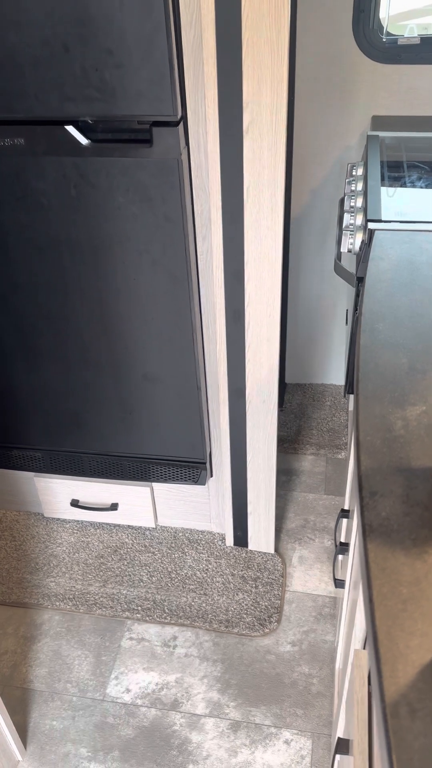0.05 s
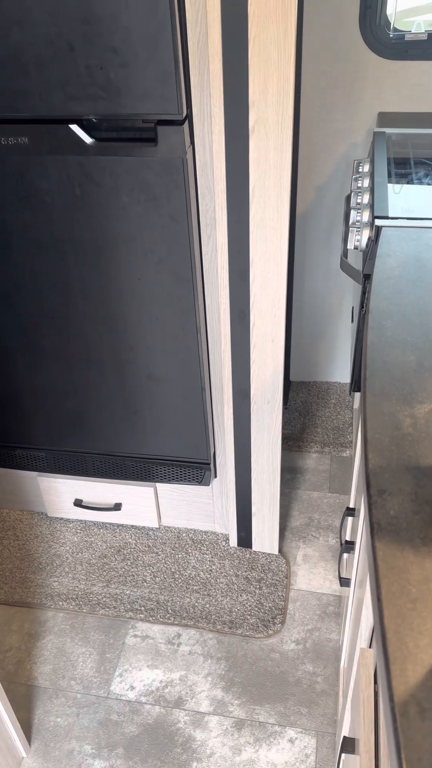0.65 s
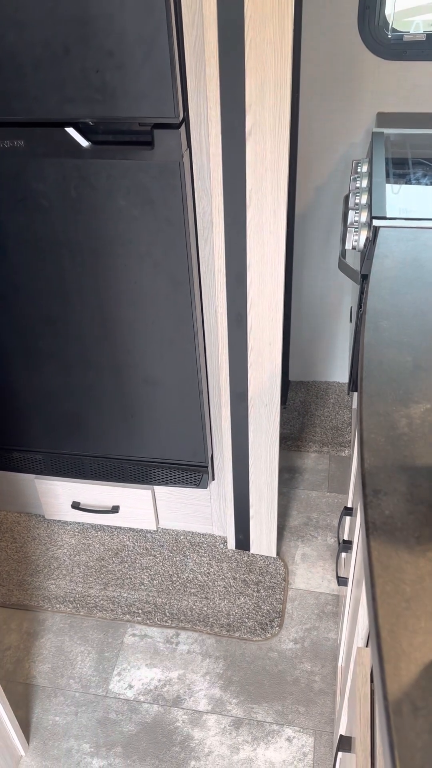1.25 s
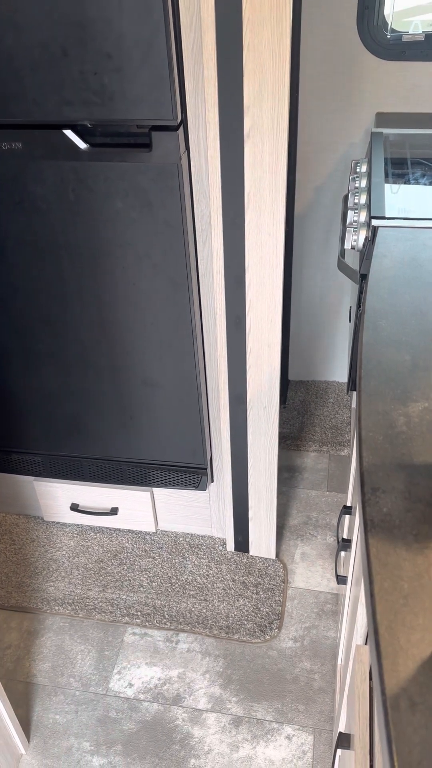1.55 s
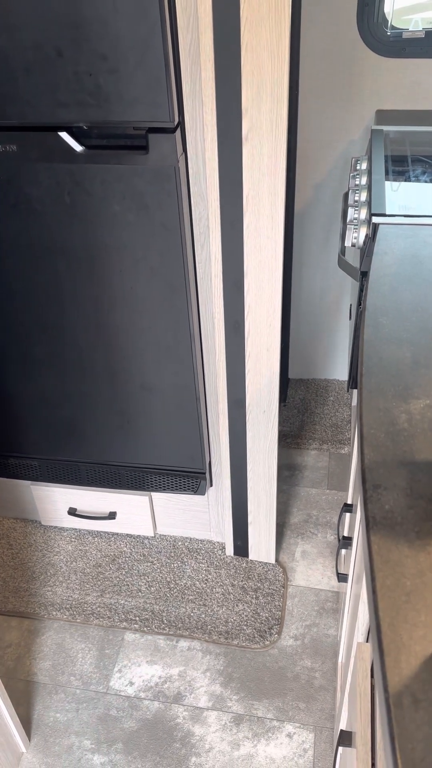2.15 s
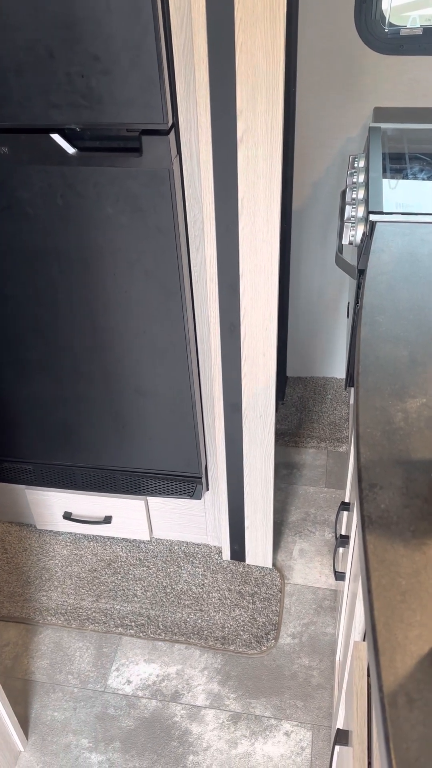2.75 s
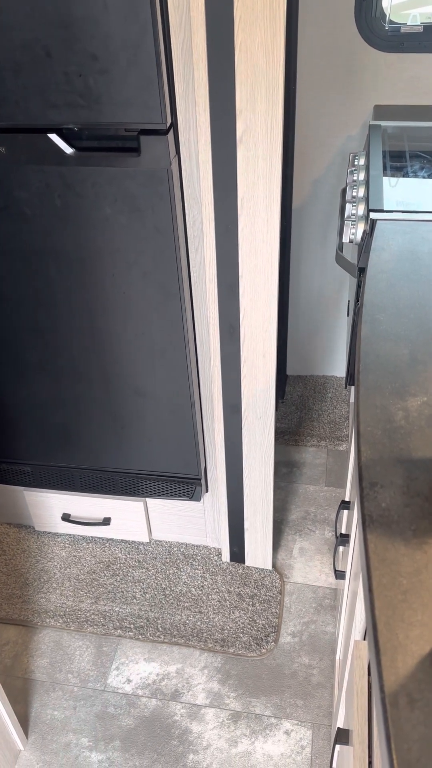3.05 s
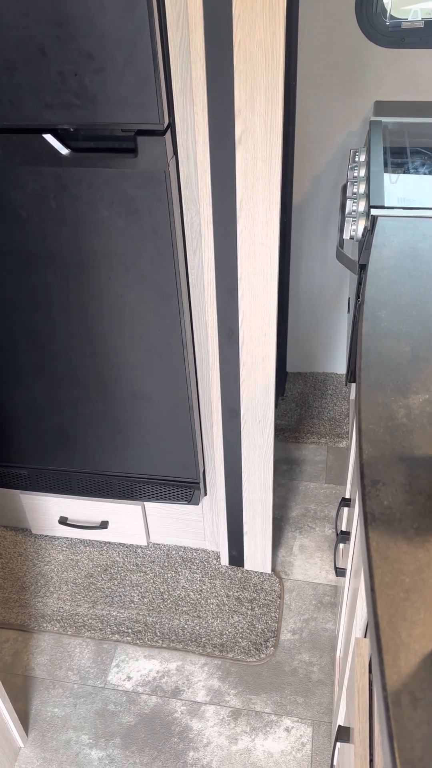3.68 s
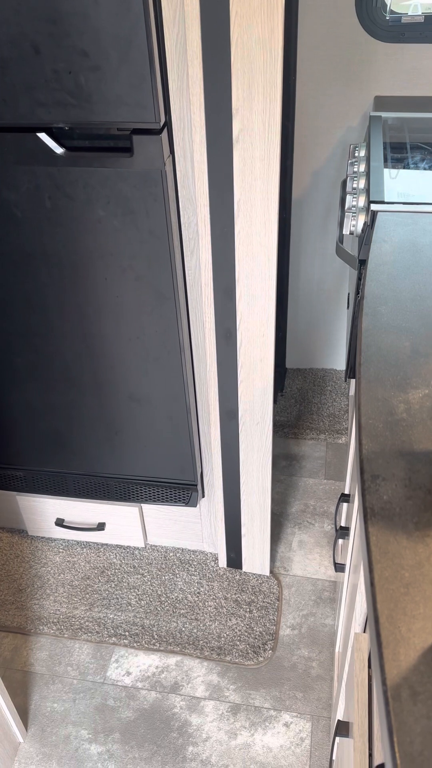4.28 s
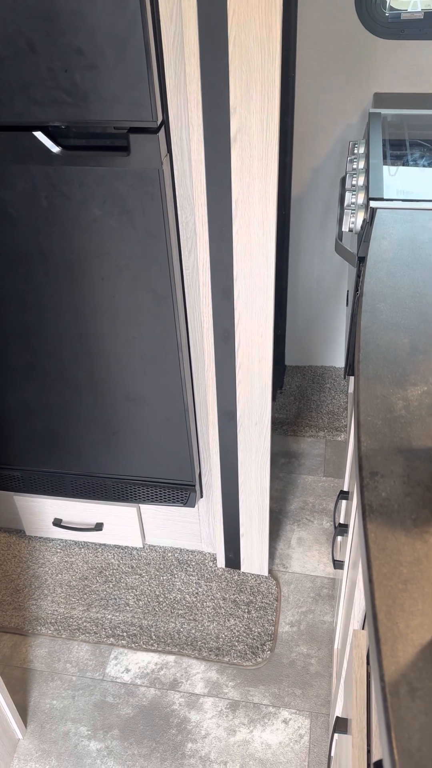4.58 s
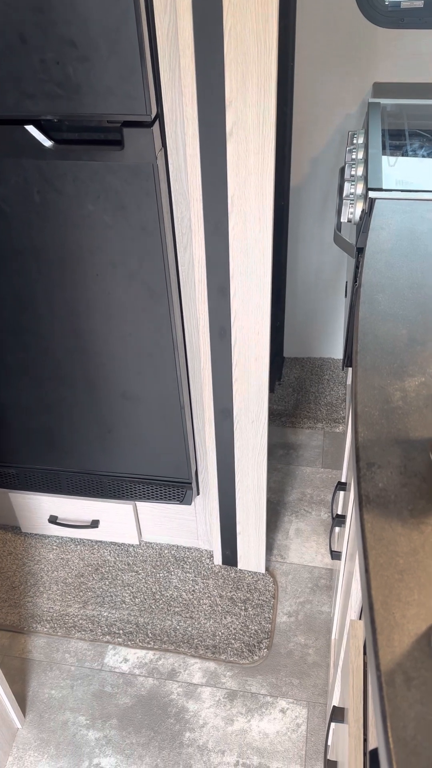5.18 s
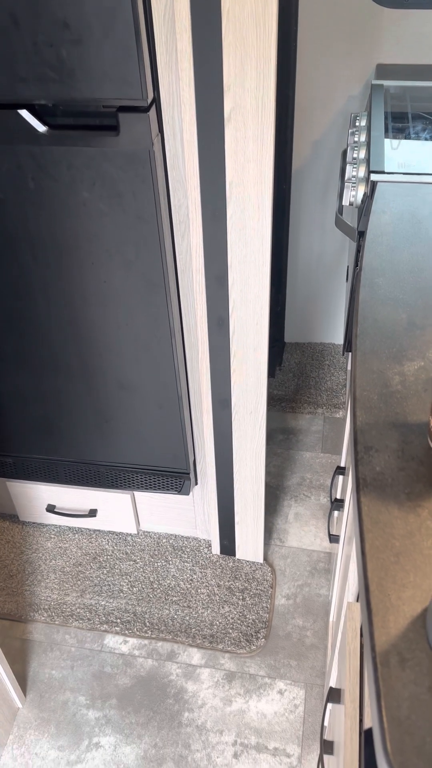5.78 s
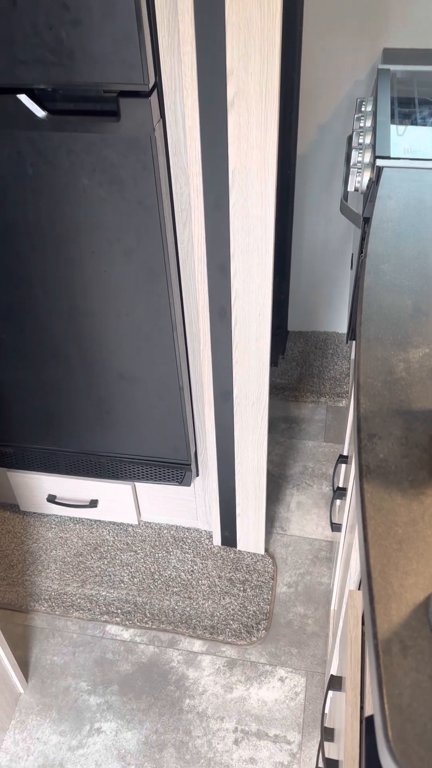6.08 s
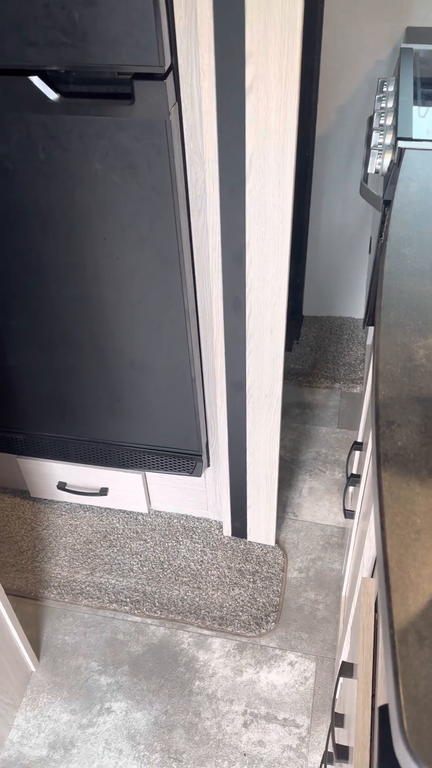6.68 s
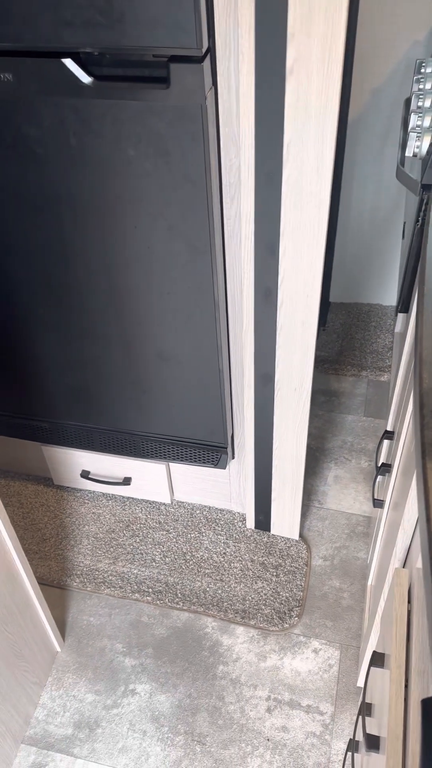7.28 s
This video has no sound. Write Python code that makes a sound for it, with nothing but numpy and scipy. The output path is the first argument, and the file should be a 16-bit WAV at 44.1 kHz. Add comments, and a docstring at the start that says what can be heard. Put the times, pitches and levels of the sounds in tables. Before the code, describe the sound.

Inside a trailer, a slide-out motor drones with a faint whine, pauses, clunks back in and keeps moving.

```python
"""An electric gear motor drives a trailer's slide-out room, heard from inside.
The drive hums through the floor, the gear mesh whines, rollers rumble and rubber seals hiss.
The room halts for half a second while the hum throbs on, then clicks back in, groans and runs on.
The frame knocks, cabinets tick, panels boom and drone. Behind it all are a steady low rumble
and faint chirps, perhaps a bird outside."""
import sys
import numpy as np
from scipy import signal
from scipy.fft import rfft, irfft
from scipy.io import wavfile
from scipy.ndimage import uniform_filter1d

SR = 44100
rng = np.random.default_rng(int(sys.argv[2]) if len(sys.argv) > 2 else 0)


def store_pcm(level_fs):
    """Save levels as 16-bit WAV."""
    pcm = np.round(np.clip(level_fs, -1, 1) * 32767).astype(np.int16)
    wavfile.write(sys.argv[1], SR, np.atleast_2d(pcm).T)


N = 323694
TIME = np.arange(N) / SR
BINS_HZ = np.fft.rfftfreq(N, 1 / SR)
STOP_S, COAST_S, RESTART_S, SPIN_UP_S = 0.32, 0.16, 0.772, 0.23


def amp(db):
    """dB to gain."""
    return 10 ** (np.asarray(db) / 20)


def unit_rms(x):
    """Scale to rms 1."""
    return x / np.sqrt(np.mean(abs(x) ** 2) + 1e-20)


def curve(rows):
    """(time_s, value) rows, interpolated per sample."""
    return np.interp(TIME, *np.transpose(rows))


def spectrum(rows):
    """(freq_hz, value) rows, interpolated per bin on a log axis."""
    hz, value = np.transpose(rows)
    return np.interp(np.log(BINS_HZ + 1), np.log(hz + 1), value)


def swells(rows):
    """Sum of flat-topped swells, in dB."""
    return sum(db * np.exp(-(2 * (TIME - centre_s) / length_s) ** 4) for centre_s, length_s, db in rows)


def halted(lag_s=0):
    """0 in travel, near 1 at rest; lag_s delays the restart."""
    stopping = np.tanh(np.maximum(TIME - STOP_S, 0) / COAST_S)
    starting = np.clip((TIME - RESTART_S - lag_s) / SPIN_UP_S, 0, 1)
    return stopping * (1 - starting)


def add(mix, start_s, sound):
    """Mix in at start_s."""
    part = mix[..., round(start_s * SR):][..., :sound.shape[-1]]
    part += sound[..., :part.shape[-1]]


def wander(rate_hz):
    """Random drift up to about rate_hz, rms 1."""
    return unit_rms(irfft(rfft(rng.standard_normal(N)) * np.exp(-(BINS_HZ / rate_hz) ** 2), N))


def coloured(white, density_db):
    """Shape white noise of rms 1 to a spectral density."""
    return irfft(rfft(white) * amp(density_db) * np.sqrt(SR / 2), N)


def tone(hz, rough, flutter_hz, echo=0):
    """Tone on two paths; the rough share flutters in level and phase."""
    flutter = np.array([wander(flutter_hz) + 1j * wander(flutter_hz) for _ in range(2)]) / np.sqrt(2)
    carrier = np.exp(2j * np.pi * (np.cumsum(hz) / SR + rng.random()))
    steady = np.array([[1], [1j * echo]])  # wall echo in quadrature
    return np.sqrt(2) * (carrier * (np.sqrt(1 - rough ** 2) * steady + rough * flutter)).real


def glides(rows, warble_depth, warble_hz):
    """Short sliding tones, uneven in pitch and level."""
    out = np.zeros(N)
    warble = 1 + warble_depth * wander(warble_hz)
    flicker = unit_rms(amp(wander(90)))
    for start_s, length_s, start_hz, end_hz, db in rows:
        count = round(length_s * SR)
        hz = np.geomspace(start_hz, end_hz, count) * warble[round(start_s * SR):][:count]
        envelope = amp(db) * np.sqrt(2) * signal.windows.tukey(count, 0.5)
        add(out, start_s, envelope * np.sin(2 * np.pi * np.cumsum(hz) / SR))
    return out * flicker


def cabin(x, t60_s, wet_db):
    """Short, dense reverb of a small furnished room, two paths."""
    t = np.arange(SR // 2) / SR
    response = rng.standard_normal((2, len(t))) * amp(-60 * t / t60_s)
    response *= amp(wet_db) / np.linalg.norm(response[0])
    response[0, 0] += 1  # direct sound
    return signal.fftconvolve(x[None], response, axes=1)[:, :N] / np.sqrt(1 + amp(wet_db) ** 2)


def strike(db, hz, octaves, t60_s, snap=0.55):
    """Band-limited crack, then cabin ring; snap runs from 0 (soft) to 2 (hard)."""
    t = np.arange(SR // 2) / SR
    bins_hz = np.fft.rfftfreq(len(t), 1 / SR)
    notch_db = -40 * np.exp(-((bins_hz - 11700) / 1200) ** 2)
    band = amp(notch_db - 6 * (np.log2((bins_hz + 1) / hz) / octaves) ** 2)
    ring = unit_rms(irfft(rfft(rng.standard_normal((2, len(t)))) * band, len(t)))
    onset = 1 - np.exp(-t * hz / 3)  # low knocks rise more slowly
    crack = 1 + snap * np.exp(-t / 0.0025)
    wavefront = np.roll(irfft(band, len(t)), SR // 3000)
    direct = snap * amp(5.5) * wavefront / wavefront.max()
    return amp(db - 60 * t / t60_s) * (onset * crack * ring + direct)


# Background spectrum: freq_hz, density_db
RUMBLE_SPECTRUM = [(10, -118), (22, -92.5), (32, -79.5), (52, -56.5), (72, -62), (100, -61), (130, -69.5),
                   (170, -69), (250, -81), (800, -101.5), (2000, -108), (16000, -135)]

def rumble():
    """The trailer's steady low rumble."""
    return coloured(rng.standard_normal((2, N)), spectrum(RUMBLE_SPECTRUM))


# Chirps: start_s, length_s, start_hz, end_hz, gain_db
CHIRPS = [(0.38, 0.038, 2730, 3450, -55), (0.402, 0.023, 3410, 3520, -49.5),
          (0.485, 0.023, 3150, 3350, -59), (.515, 0.027, 3770, 3560, -61), (0.6, 0.036, 3800, 3250, -61.5),
          (1.277, 0.032, 3240, 3520, -48.5), (1.695, 0.034, 3750, 3050, -53.5),
          (1.975, 0.045, 4230, 3000, -55), (2.525, .04, 3300, 3650, -58.5),
          (2.69, 0.026, 3690, 3500, -50.5), (3.08, 0.05, 4250, 3500, -55.5), (4.29, 0.04, 4120, 3550, -55),
          (4.485, 0.027, 3600, 3850, -52), (4.715, 0.04, 4200, 3700, -58), (5.38, 0.031, 3570, 3525, -49)]

def chirps():
    """Distant chirps, arriving mostly as echo."""
    return amp(-1.5) * cabin(glides(CHIRPS, warble_depth=0.02, warble_hz=450), t60_s=0.18, wet_db=8)


# Wall panel mode: time_s, pitch_hz, level_db
PANEL_DRONE = [(0, 275, -80.5), (3.401, 278.8, -53.5), (4.3, 275.9, -45), (5, 286, -47), (5.6, 283, -46.5),
               (5.85, 281.7, -42), (6.35, 281.7, -39), (6.55, 278.5, -44), (7.34, 278, -41)]

def panel():
    """A wall panel drones near its own pitch in the second half of the travel."""
    time_s, hz, db = np.transpose(PANEL_DRONE)
    return amp(np.interp(TIME, time_s, db)) * tone(np.interp(TIME, time_s, hz), rough=0.5, flutter_hz=24)


# Frame knocks: start_s, thud_db, rattle_db
KNOCKS = [(.296, -34, -53), (0.822, -40.5, -50), (.958, -32.5, -51), (1.263, -29, -42.5),
          (7.192, -34.5, -49), (7.275, -32.5, -42.5)]
# Drive and cabinet clicks: start_s, level_db, centre_hz, t60_s, snap
CLICKS = [(0.186, -42, 8800, 0.15, 0.72), (.297, -45, 900, .07, 1), (0.821, -41, 8600, 0.14, 1.5),
          (0.840, -39, 1640, 0.095, .6), (.851, -47, 1490, 0.11, 1.5), (0.959, -52, 6500, 0.21, .7),
          (1.504, -50.5, 6500, 0.043, 2), (1.781, -51, 5000, 0.08, .8), (4.124, -43, 2630, 0.16, 0.19),
          (5.225, -45, 2150, 0.039, .2), (5.725, -48, 3900, 0.13, .1)]

def knocks():
    """The frame thuds and rattles; drive and cabinets click."""
    out = np.zeros((2, N))
    for start_s, thud_db, rattle_db in KNOCKS:
        add(out, start_s, strike(thud_db, hz=412, octaves=1.09, t60_s=0.14))
        add(out, start_s, strike(rattle_db, hz=2210, octaves=1.1, t60_s=0.14))
    for start_s, db, hz, t60_s, snap in CLICKS:
        add(out, start_s, strike(db, hz, octaves=0.88, t60_s=t60_s, snap=snap))
    return out


# Panel booms: start_s, level_db, pitch_hz, t60_s
BOOMS = [(.305, -26, 322, 0.19), (.834, -19, 140, 0.23), (.955, -29, 534, 0.098), (1.632, -23.5, 349, 0.27),
         (4.092, -37, 215, .12), (6.164, -28, 291, .12)]

def booms(rise_s=0.0073):
    """Jolted panels ring in one mode each; two paths in quadrature."""
    out = np.zeros((2, N))
    t = np.arange(SR // 2) / SR
    for start_s, db, hz, t60_s in BOOMS:
        phase = 2 * np.pi * hz * t
        envelope = amp(db - 60 * t / t60_s) * (1 - np.exp(-t / rise_s))
        add(out, start_s, envelope * np.array([np.sin(phase), np.cos(phase)]))
    return out


# Seal friction: freq_hz, density_db
SEAL_SPECTRUM = [(500, -110), (2000, -113), (3600, -97), (4400, -96), (5200, -99), (6300, -93), (8400, -93),
                 (9500, -99), (10600, -119), (12000, -128), (13500, -114), (15300, -105), (16200, -120)]
# Drag spots: centre_s, length_s, gain_db
SEAL_DRAGS = [(1.19, 0.25, 3.5), (1.7, 0.14, 2), (2.69, 0.11, 4.5), (3.72, 0.63, 1), (6.75, .07, 3)]

def seals():
    """Rubber seals and carpet rub: a grainy hiss that swells where they drag."""
    grain_db = 0.29 * wander(400) + 0.67 * wander(11)
    pause_db = -17.5 * halted(lag_s=0.095)  # rubber flexes before it slides
    hiss = coloured(rng.standard_normal((2, N)), spectrum(SEAL_SPECTRUM))
    return hiss * amp(pause_db + grain_db + swells(SEAL_DRAGS))


def floor_patches(x, depth_db):
    """Narrow resonances come and go as the rollers meet new spots of floor."""
    hz, t, frames = signal.stft(x, SR, nperseg=2048, noverlap=1536)
    patches = rng.standard_normal((len(t), len(hz))).T
    patches = unit_rms(uniform_filter1d(uniform_filter1d(patches, size=3, axis=0), size=7, axis=1))
    floor_band = 1 / (1 + (hz[:, None] / 166) ** 4)
    box_band = np.exp(-((hz[:, None] - 402) / 150) ** 2)
    floor_db = 5 - 1.5 * t
    box_db = 2 - 3.5 * np.maximum(t - 5.93, 0)  # the room's box holds, then fades near the end
    frames *= amp(depth_db * patches * (1 - floor_band) + floor_db * floor_band + box_db * box_band)
    return signal.istft(frames, SR, nperseg=2048, noverlap=1536)[1][:, :N]


# Rolling noise: freq_hz, density_db
ROLLER_SPECTRUM = [(40, -75), (100, -60), (140, -71.5), (190, -70.5), (260, -75.5), (400, -75),
                   (620, -79.5), (1000, -83.5), (1400, -91), (1750, -95), (2300, -92), (2900, -97.5),
                   (5000, -110), (10000, -135)]
# Modes of the room's box: centre_hz, width_hz, lift_db
BOX_MODES = [(299.6, 22, 10), (337.6, 13.7, 10), (427, 45, 0.5), (517, 26, 2), (617, 77, 2.5), (653, 13, 6),
             (1100, 17, 4)]

def rollers(jolts_per_s=120):
    """Rolling noise and small jolts from the rack's teeth, coloured by the box modes."""
    lift_db = sum(db / (1 + (2 * (BINS_HZ - hz) / width_hz) ** 2) for hz, width_hz, db in BOX_MODES)
    jolts = rng.uniform(-0.96, 1, N) * (rng.random(N) < jolts_per_s / SR)
    jolts = unit_rms(cabin(jolts, t60_s=0.06, wet_db=18))
    contact = unit_rms(rng.standard_normal((2, N)) + amp(-9.5) * jolts)
    rolling = coloured(floor_patches(contact, depth_db=3), spectrum(ROLLER_SPECTRUM) + lift_db)
    judder_db = 1.07 * wander(11)
    return rolling * amp(3 - 15 * halted() + judder_db)


# Gear creaks: start_s, length_s, start_hz, end_hz, gain_db
GROANS = [(0.895, 0.051, 638, 750, -39.5), (.957, 0.019, 647, 724, -37), (0.972, 0.022, 832, 960, -46)]

def groans():
    """The gears creak upward as they take up the load at the restart."""
    return cabin(glides(GROANS, warble_depth=0.07, warble_hz=220), t60_s=0.12, wet_db=-5)


# Whine pitch, drifting with load: time_s, pitch_hz
WHINE_PITCH = [(0, 2133), (1, 2193), (1.35, 2113), (2, 2148), (2.6, 2140), (3.2, 2110), (4.1, 2170),
               (5, 2161), (5.45, 2127), (5.75, 2172), (6.5, 2232), (7.34, 2179)]
# Whine between flares: time_s, level_db
WHINE_LEVEL = [(0, -65), (1.1, -65), (1.4, -62.5), (2.3, -64.5), (3.3, -60.5), (4.6, -64.5), (5.45, -67.5),
               (5.75, -60.5), (6.3, -62.5), (6.65, -64), (7, -63), (7.34, -59)]
# Flares as the mesh tightens: centre_s, length_s, gain_db
WHINE_FLARES = [(2.015, 0.15, 9), (2.185, .14, 11), (2.34, 0.15, 8), (2.51, 0.11, 8.5), (2.69, .13, 5.5),
                (2.93, 0.066, 6.5), (3.25, 0.107, 3), (3.56, 0.11, 4), (3.735, 0.14, 7), (3.92, 0.088, 9.5),
                (4.01, 0.054, 5), (4.14, .13, 9), (4.27, 0.052, 9), (4.445, 0.055, 9), (4.775, .06, 8),
                (4.97, 0.11, 9.5), (5.08, .11, 8), (5.205, 0.073, 7.5), (5.32, 0.12, 7.5),
                (5.57, 0.17, 3.5), (5.92, 0.14, 4), (6.08, 0.091, 7), (6.25, .1, 4.5), (6.4, .1, 7)]
# Gear mesh lines: shaft_order, gain_db
MESH_ORDERS = [(18, -17), (20, 3), (24, -8)]
# Frame-borne lines: shaft_order, level_db, slope_db_per_s
FRAME_ORDERS = [(1, -48, -0.2), (3, -59.5, 0.06), (6, -69, 1.26)]
# Frame transmission: time_s, gain_db
FRAME_GAIN = [(0, 6.5), (1, 3), (3.7, 2.5), (4.1, 4.5), (4.8, 12.5), (5.1, -1), (7.34, 2)]

def motor(whine_order=20):
    """Fast shaft: high orders whine in the gear mesh, low orders shake the frame."""
    jitter = 1 + 0.00212 * wander(11.37) + 0.003 * wander(45)
    shaft_hz = curve(WHINE_PITCH) / whine_order * jitter
    mesh = sum(amp(db) * tone(order * shaft_hz, rough=0.38, flutter_hz=42, echo=-0.3)
               for order, db in MESH_ORDERS)
    frame = sum(amp(db + slope * TIME) * tone(order * shaft_hz, rough=0.48, flutter_hz=22.6)
                for order, db, slope in FRAME_ORDERS)
    mesh_db = curve(WHINE_LEVEL) + swells(WHINE_FLARES) - 40 * halted()
    frame_db = curve(FRAME_GAIN) - 15 * halted()
    return amp(mesh_db) * mesh + amp(frame_db) * frame


# Hum fundamental: time_s, pitch_hz
HUM_PITCH = [(0, 70.43), (.7, 69.5), (1.7, 76.41), (4.2, 83.98), (5.45, 74.5), (7, 84.22)]
# Hum envelope: time_s, level_db
HUM_LEVEL = [(0, -43), (.25, -33), (.77, -32.5), (.87, -28.5), (1.25, -27.5), (1.85, -31), (2.6, -29),
             (3.1, -27), (3.6, -31), (4.25, -38.5), (4.5, -32), (4.95, -31.5), (5.1, -40.5), (5.7, -43.5),
             (6.1, -38), (6.5, -32), (7, -31), (7.25, -44.5)]
# Brief swells and one dip in the hum: centre_s, length_s, gain_db
HUM_SWELLS = [(.36, .06, 4.5), (.61, .07, 4), (.98, .035, -21), (4.46, .06, 4.5), (5.32, 0.059, 7),
              (6.49, .055, 5.5)]
# Hum partials: harmonic, gain_db
HUM_HARMONICS = [(1, -1), (2, -10.5), (3, -21), (4, -29), (6, -33), (8, -25.5)]

def hum(pulse_hz=9.8, first_dip_s=0.428, throb_period_s=0.118):
    """The drive shakes the floor once a turn; it pulses in travel and throbs while the room stands."""
    hz = curve(HUM_PITCH)
    level_db = curve(HUM_LEVEL) + swells(HUM_SWELLS)
    overtone_db = -17.5 * halted() - 2 * TIME  # weak off load, thinning with travel
    standing = uniform_filter1d(((TIME > STOP_S) & (TIME < RESTART_S)) * 1.0, size=SR // 20)
    throb_db = -14 * standing * np.cos(np.pi * (TIME - first_dip_s) / throb_period_s) ** 4
    pulse_cycles = np.cumsum(pulse_hz * (1 + 0.16 * wander(2.48))) / SR
    pulse_db = (1 - standing) * np.sin(2 * np.pi * pulse_cycles)
    (_, fundamental_db), *overtones = HUM_HARMONICS
    out = amp(fundamental_db) * tone(hz, rough=0.09, flutter_hz=34)
    for harmonic, db in overtones:
        out += amp(db + overtone_db) * tone(harmonic * hz, rough=0.25, flutter_hz=8)
    return amp(level_db + throb_db + pulse_db) * out


# Left-right likeness: freq_hz, coherence
COHERENCE = [(30, .4), (55, .5), (70, .92), (86, .92), (105, .66), (150, .72), (330, .87), (550, .72),
             (1100, .68), (1450, .35), (2400, .38), (4000, .66), (5000, .48), (5500, .86), (15000, .86)]
# Balance: freq_hz, left_minus_right_db
BALANCE = [(35, 3), (62, -2), (99, -1), (160, -4.5), (270, -11.5), (450, -0.5), (740, -3), (1220, 0),
           (2010, -0.5), (3330, -0.5), (5500, 0.0), (9080, 0), (15000, -4.5)]
# Phase difference: freq_hz, left_lead_rad
PHASE_LEAD = [(0, 0), (430, -3.2), (1210, -3.7), (1640, -5.9), (1950, -6.3), (2840, -3.9), (3650, -5.9),
              (4800, -5.6), (5300, -6.4), (9300, -8.6), (10000, -9), (15000, -10.3)]

def stereo(paths):
    """Two paths to left and right, with coherence, delay and balance per bin."""
    common, side = rfft(paths)
    coherence = np.clip(spectrum(COHERENCE), 0, 1)
    delay = np.exp(-1j * np.interp(BINS_HZ, *np.transpose(PHASE_LEAD)))
    balance = amp(spectrum(BALANCE))
    left = common * balance
    right = (coherence * common + np.sqrt(1 - coherence ** 2) * side) * delay
    return irfft(np.array([left, right]) * np.sqrt(2 / (1 + balance ** 2)), N)


def scene():
    """Drive, moving room and background, in stereo."""
    drive = hum() + motor() + groans()
    room = panel() + rollers() + seals() + knocks() + booms()
    return stereo(drive + room + chirps() + rumble())


def record(dry):
    """Low-pass at 16 kHz."""
    lowpass = signal.firwin(511, 16000, window=("kaiser", 9), fs=SR)
    return signal.oaconvolve(dry, lowpass[None], "same")


dry = scene()
out = record(dry)
store_pcm(out)
```